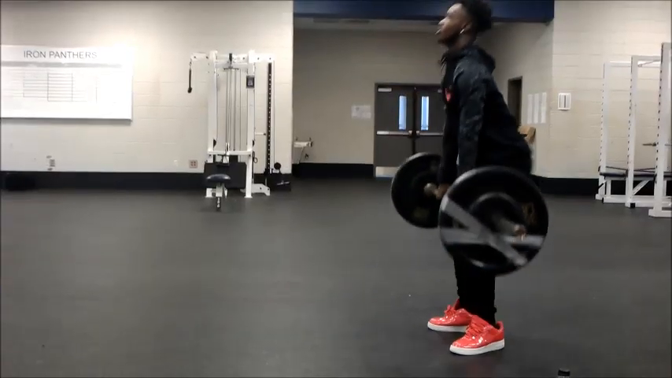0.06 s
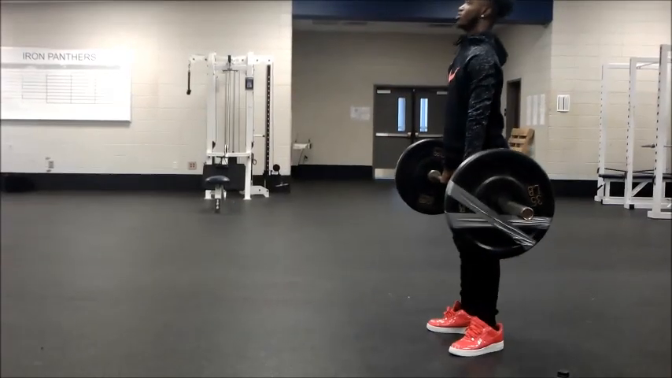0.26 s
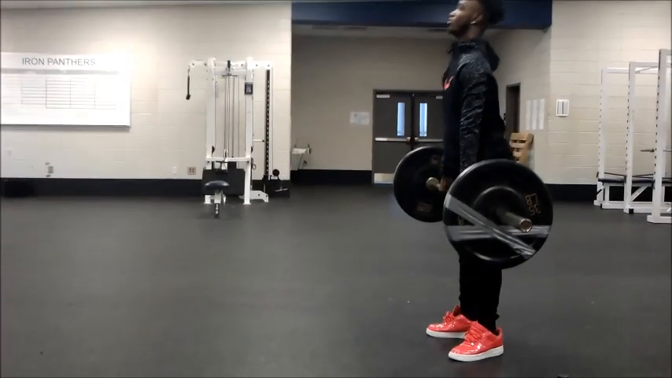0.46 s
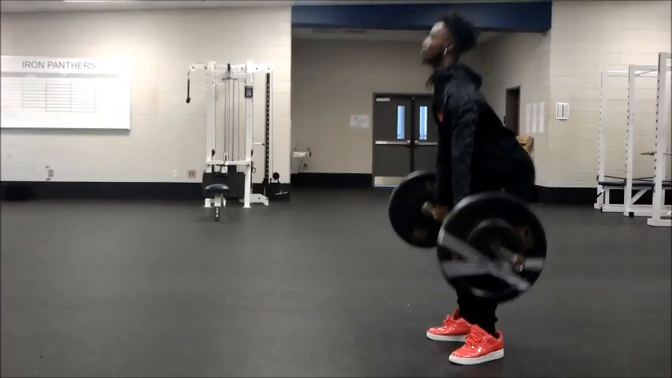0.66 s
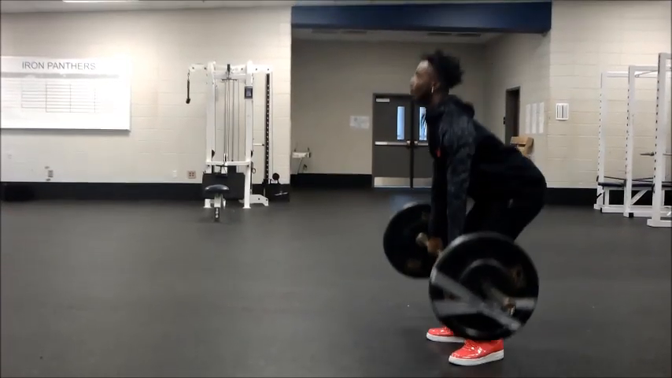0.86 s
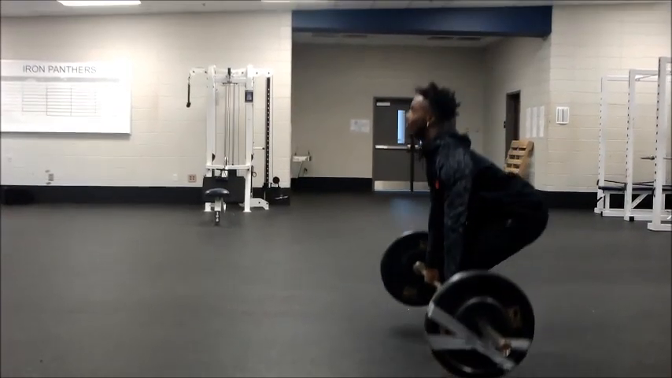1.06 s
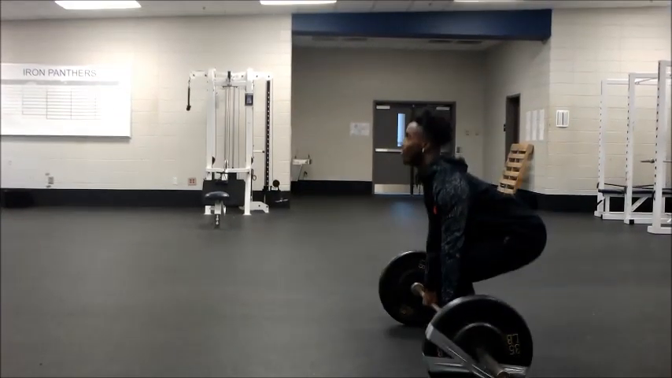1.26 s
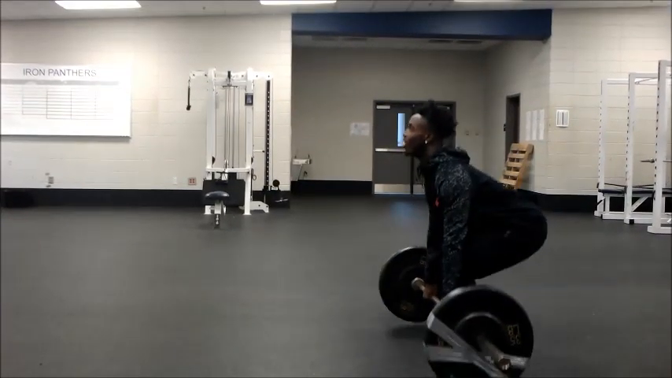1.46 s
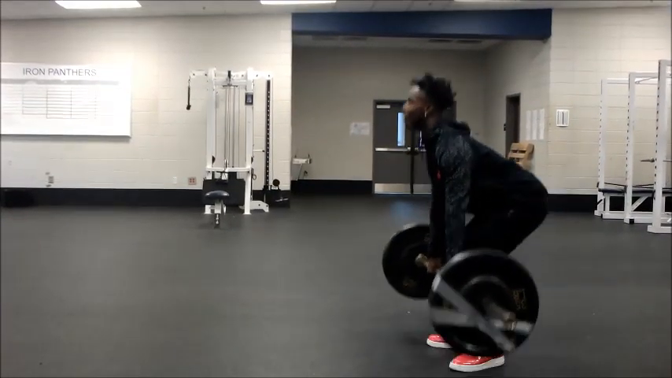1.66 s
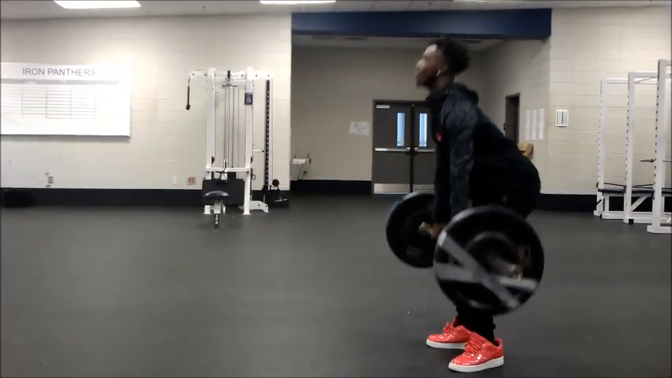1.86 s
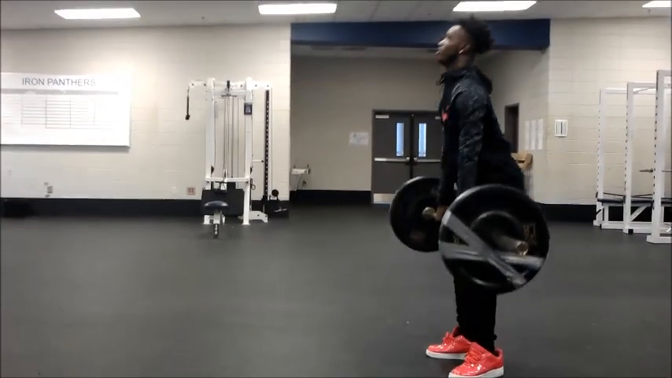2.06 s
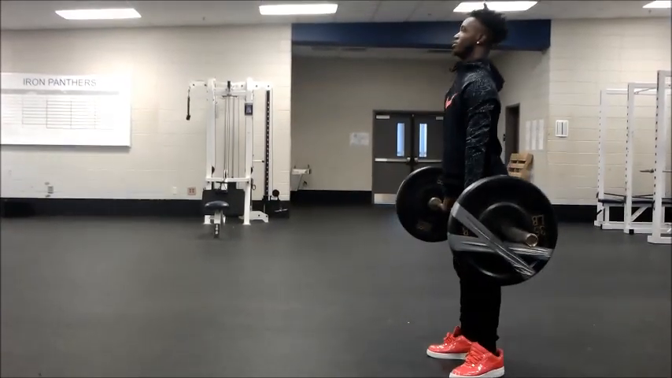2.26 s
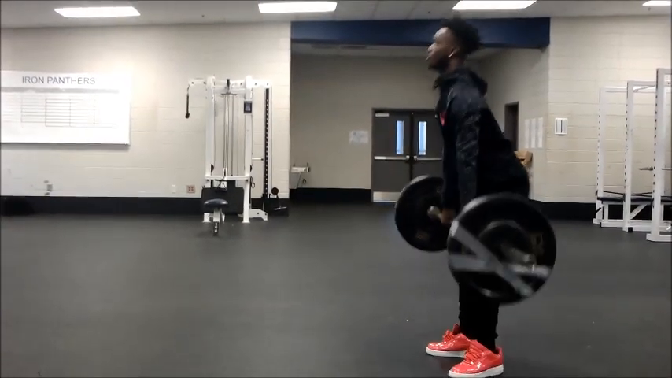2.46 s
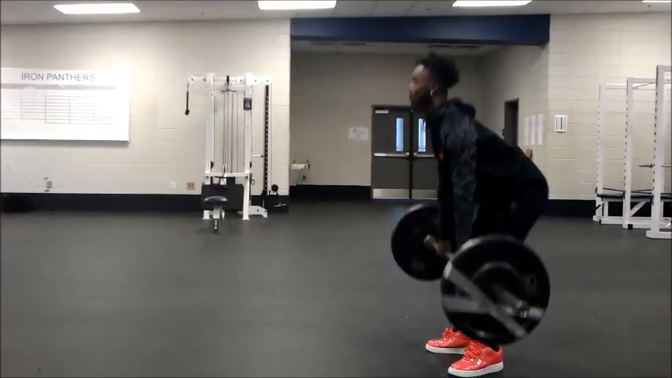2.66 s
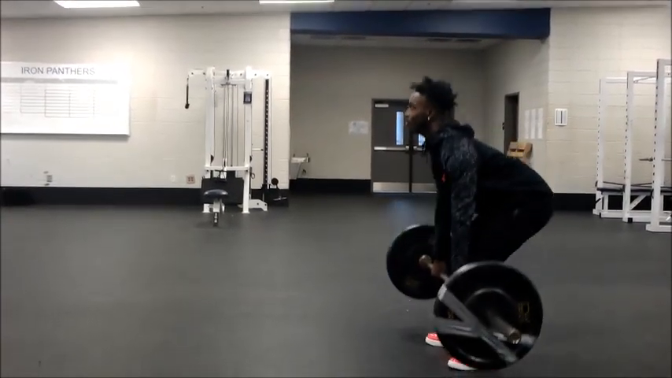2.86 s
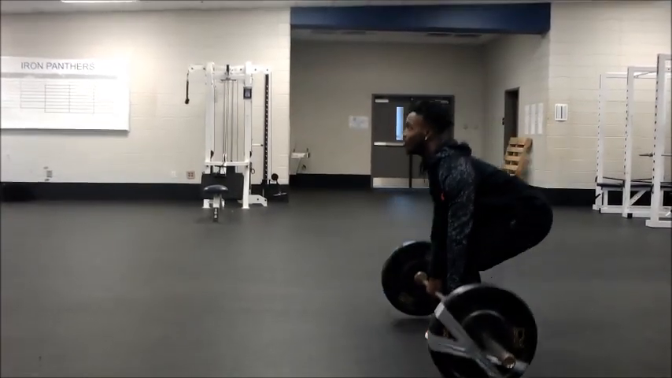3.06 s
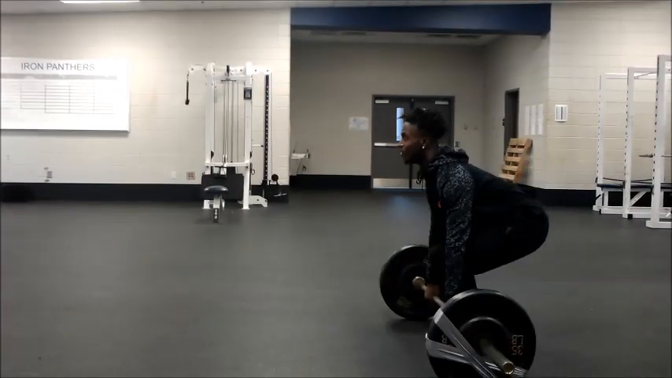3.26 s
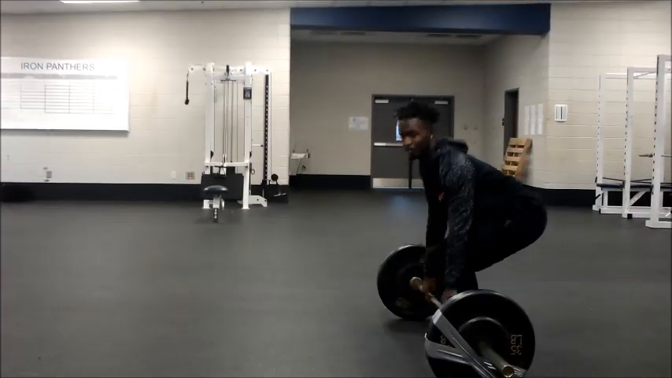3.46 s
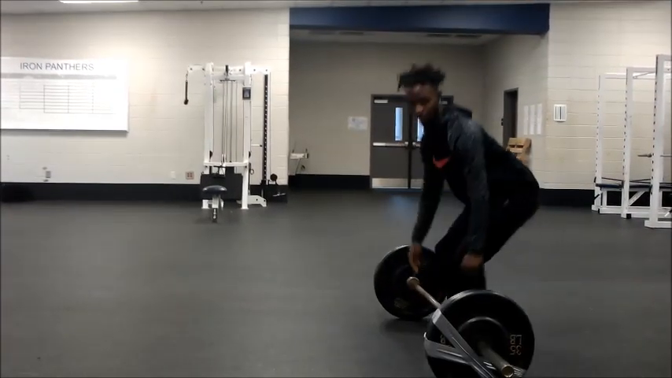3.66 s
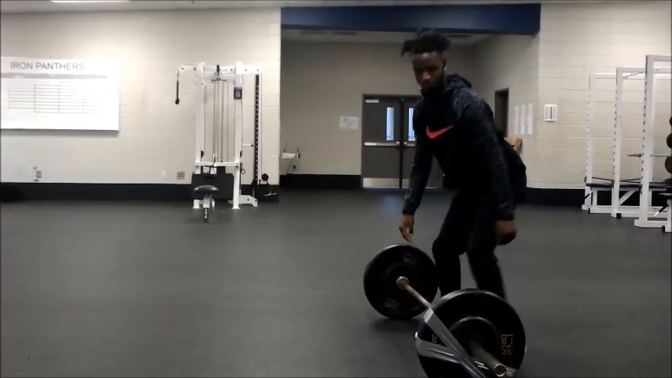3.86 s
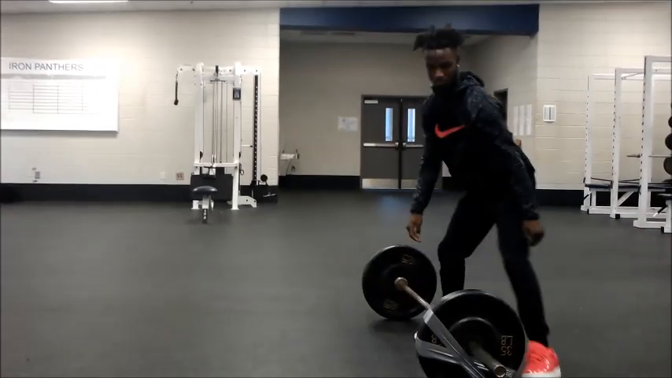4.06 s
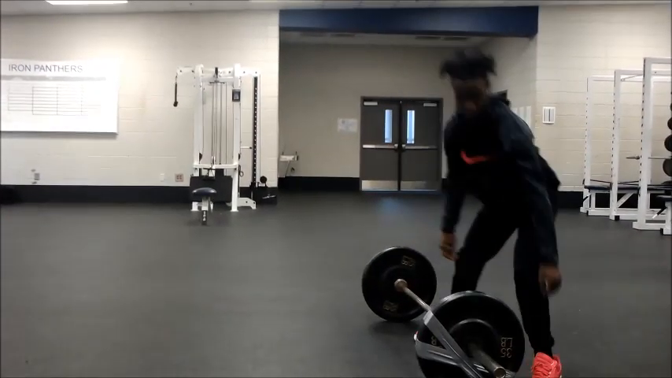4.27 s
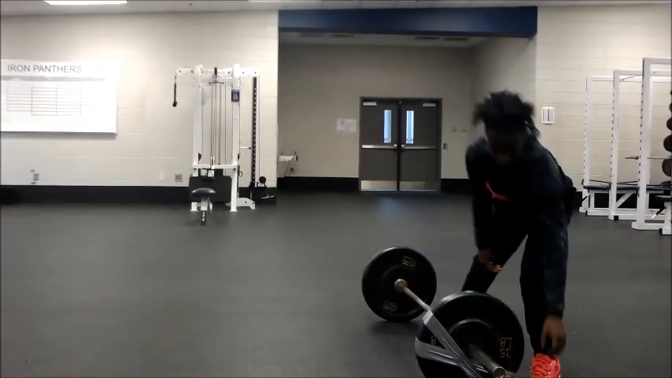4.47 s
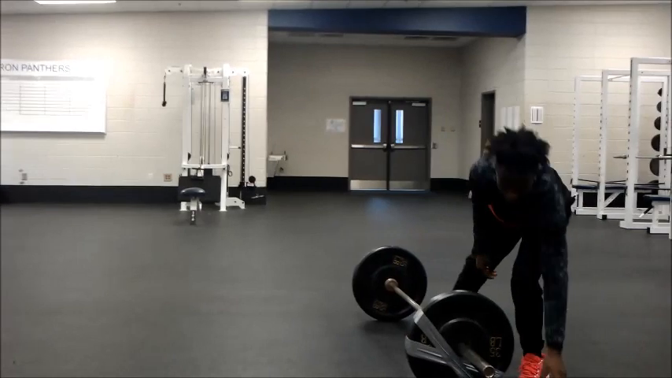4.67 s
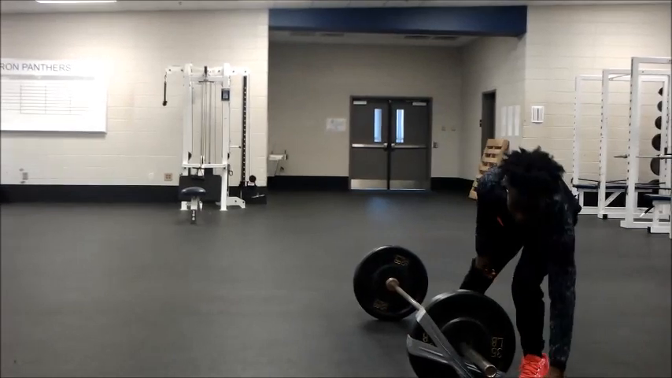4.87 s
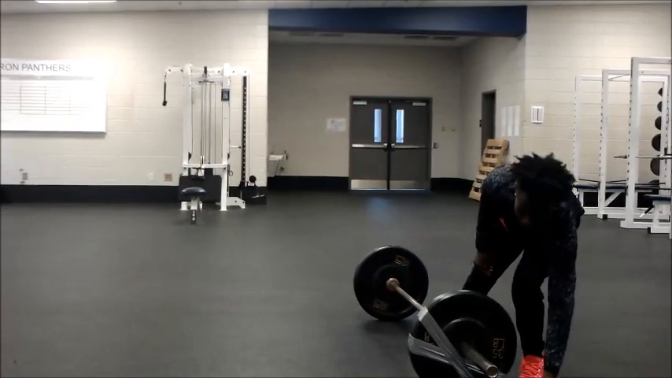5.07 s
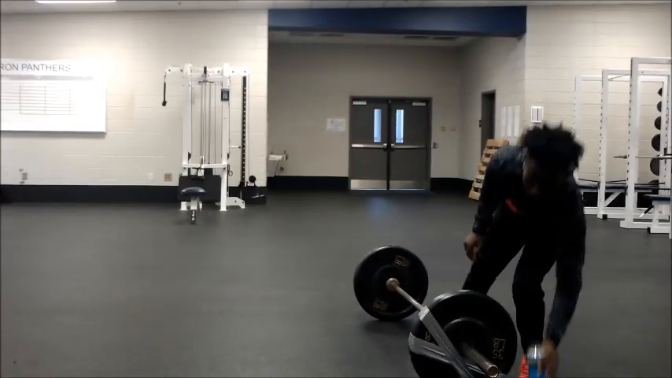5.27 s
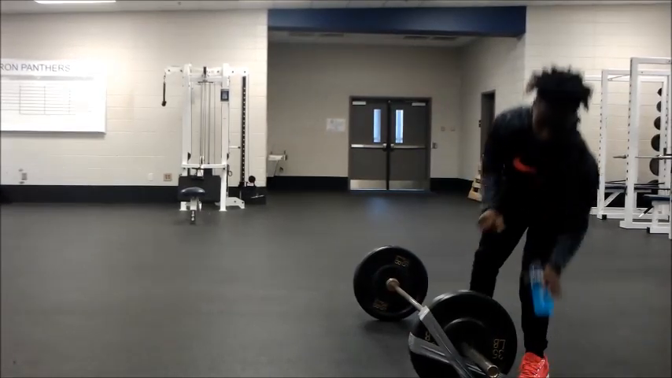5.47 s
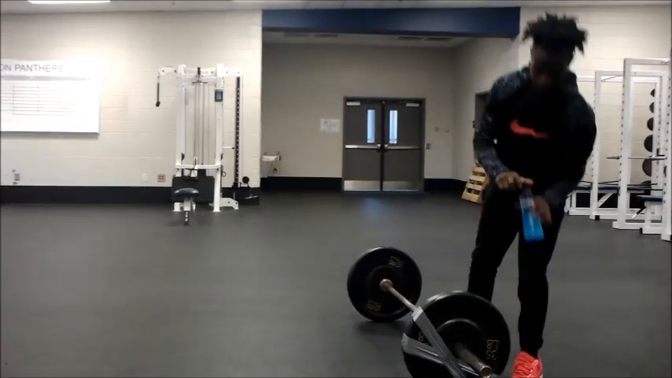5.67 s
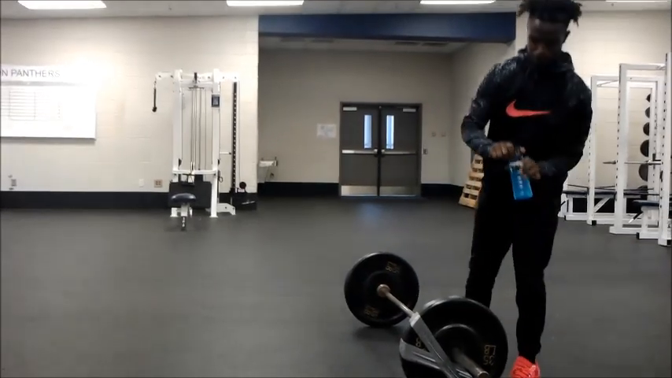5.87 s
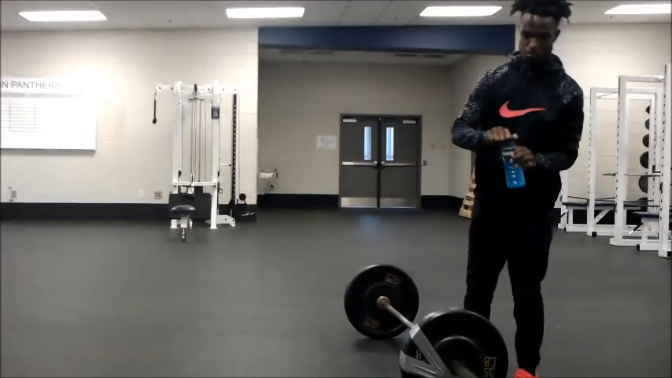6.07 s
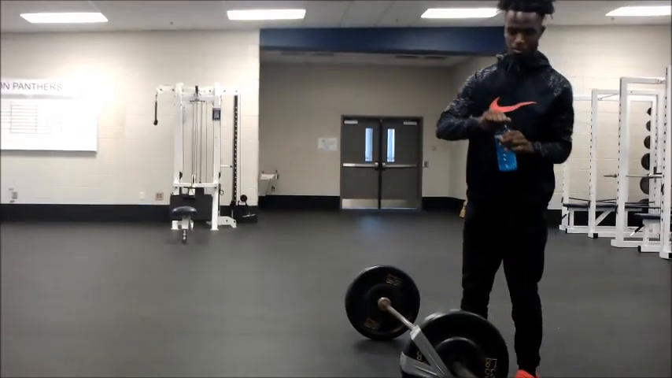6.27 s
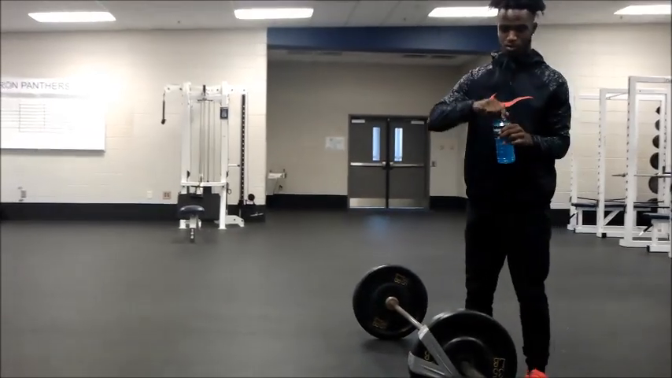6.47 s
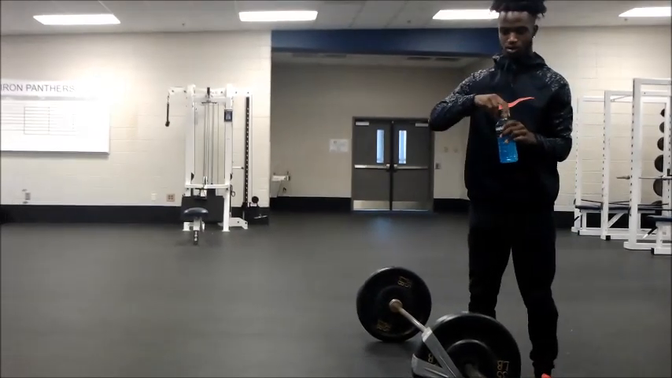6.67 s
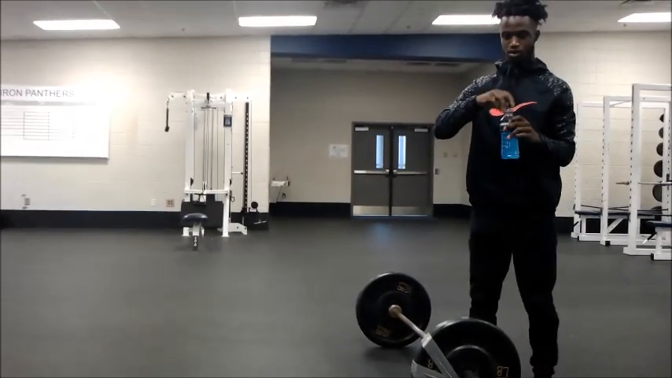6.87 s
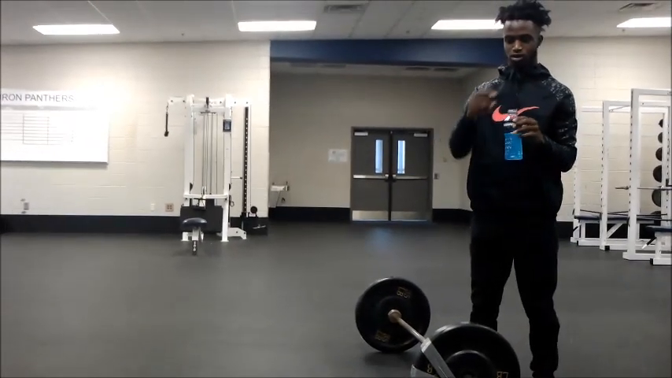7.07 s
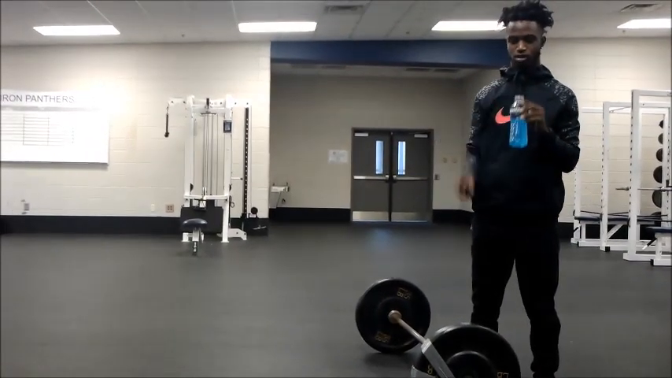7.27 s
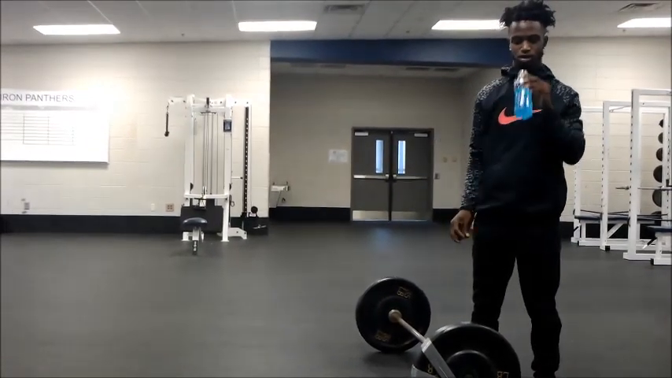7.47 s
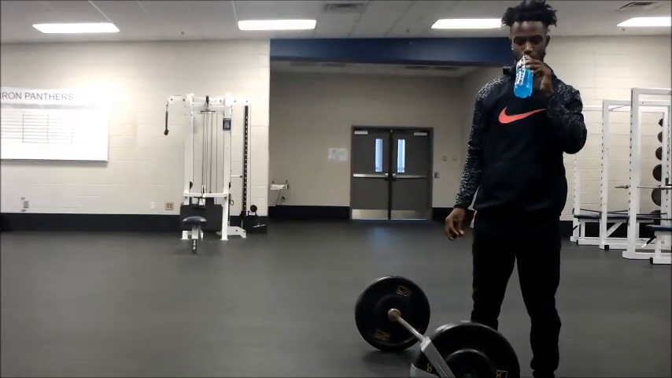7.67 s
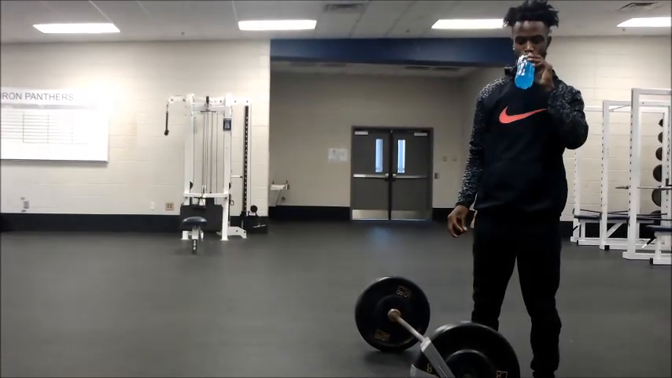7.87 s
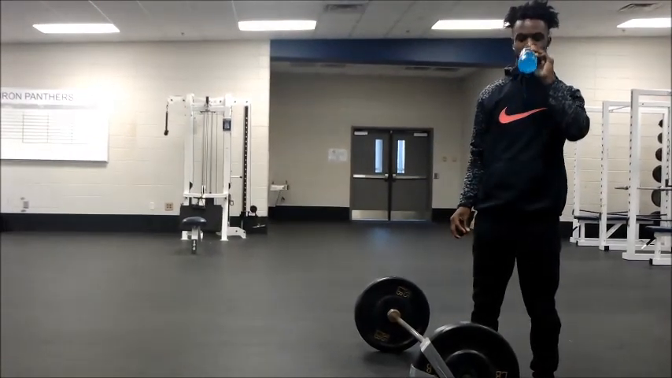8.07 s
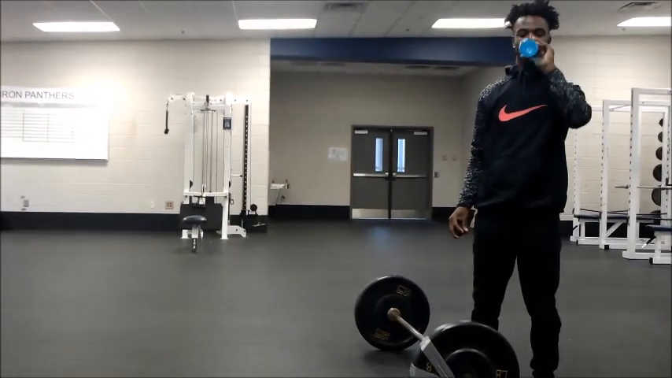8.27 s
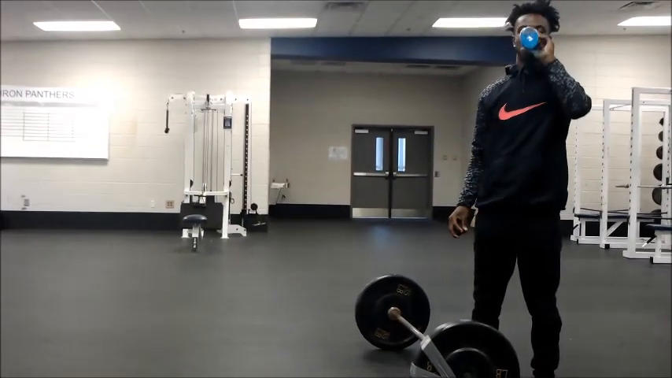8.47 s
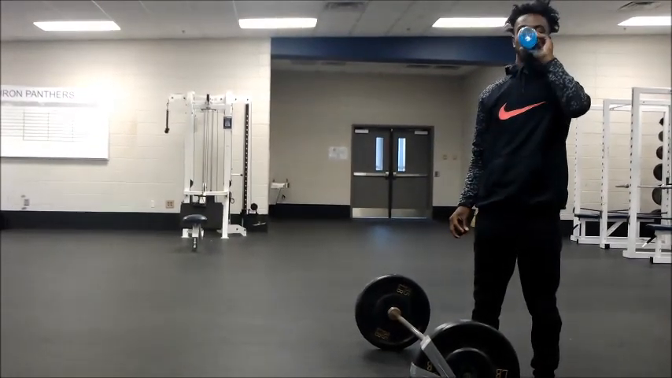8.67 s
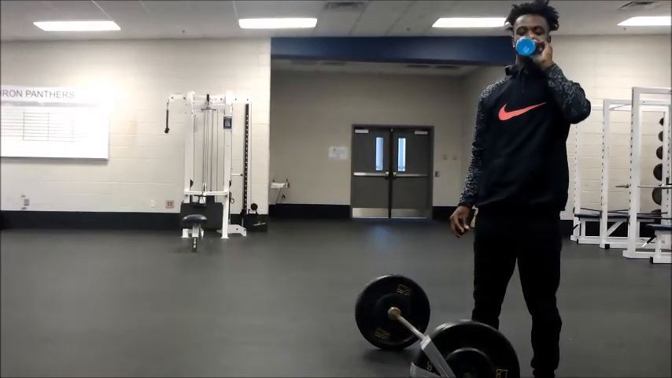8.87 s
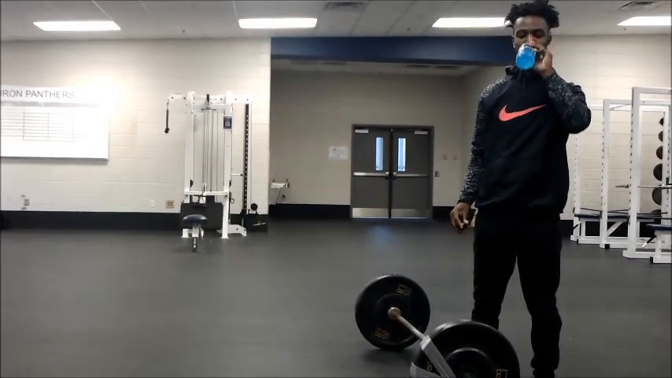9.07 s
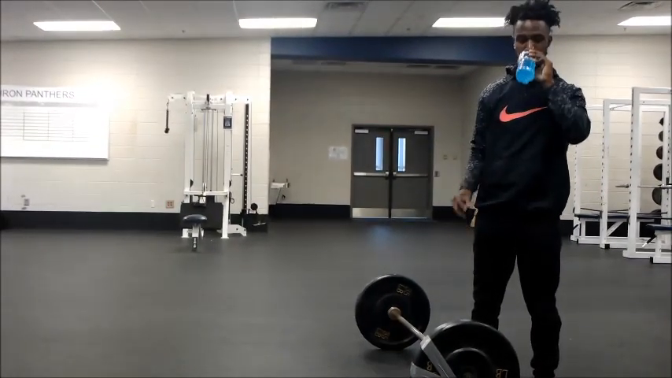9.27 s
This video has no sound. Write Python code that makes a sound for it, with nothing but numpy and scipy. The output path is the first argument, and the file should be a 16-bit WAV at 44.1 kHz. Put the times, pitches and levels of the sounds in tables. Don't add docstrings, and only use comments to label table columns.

```python
import sys
import numpy as np
from scipy import signal
from scipy.fft import rfft, irfft
from scipy.io import wavfile
from scipy.ndimage import uniform_filter1d

SR = 44100
rng = np.random.default_rng(int(sys.argv[2]) if len(sys.argv) > 2 else 0)


def wav_record(signal):
    frames = np.transpose(np.atleast_2d(signal))
    bounded = np.clip(frames, -1, 1)
    quanta = np.round(bounded * 32767).astype(np.int16)
    wavfile.write(sys.argv[1], SR, quanta)


def gain_from_db(level_db):
    decades = np.asarray(level_db, float) / 20
    return 10 ** decades


N = 411012


def rms_one(x):
    return x / np.sqrt(np.mean(x ** 2) + 1e-20)


def coloured(x, points):
    hz, db = np.transpose(points)
    grid_hz = np.fft.rfftfreq(len(x), 1 / SR) + 1
    gain_db = np.interp(np.log(grid_hz), np.log(hz), db)
    return irfft(rfft(x) * gain_from_db(gain_db), len(x))


def clicks(times_s, db):
    out = np.full(N, 1e-18)
    out[np.round(np.asarray(times_s) * SR).astype(int)] += gain_from_db(db)
    return out


def ring(x, hz, t60_s):
    r = gain_from_db(-60 / (t60_s * SR))
    w = 2 * np.pi * hz / SR
    return signal.lfilter([0, np.sin(w)], [1, -2 * r * np.cos(w), r * r], x)


def resonance(x, hz, width_hz):
    r = np.exp(-np.pi * width_hz / SR)
    w = 2 * np.pi * hz / SR
    return signal.lfilter([(1 - r * r) / 2, 0, (r * r - 1) / 2], [1, -2 * r * np.cos(w), r * r], x)


def bandpass(x, low_hz, high_hz):
    return signal.sosfilt(signal.butter(2, [low_hz, high_hz], "band", fs=SR, output="sos"), x)


def puff(t60_s, size):
    return rng.standard_normal(size) * gain_from_db(-60 * np.arange(size) / SR / t60_s)


def peak_one(x):
    return x / np.abs(x).max()


def add_at(out, start_s, burst):
    at = round(start_s * SR)
    out[at:at + len(burst)] += burst


def plates(crack_db, contact_s):
    # start_s, strength_db, part struck, extra_ring_db
    clanks = [(1.376, -7.5, "all", 14), (1.389, -7, "hub", 8.5), (1.407, -15.5, "web", 3.5),
              (1.417, -16.5, "rim", 3), (1.470, -12.5, "sleeve", 10), (1.502, -16, "sleeve", 1),
              (3.279, -13, "web", 11), (3.291, -7, "sleeve", 2.5), (3.315, -20, "rim", 0.5),
              (3.342, -15, "rim", 4.5), (3.385, -22.5, "hub", 10), (3.402, -13.5, "sleeve", 15.5),
              (3.527, -12, "all", 2), (3.548, -14, "hub", 13.5), (3.590, -19.5, "rim", -8.5),
              (3.610, -22, "sleeve", 5.5)]
    # start_s, strength_db, part struck, extra_ring_db
    shifts = [
        (.001, -48.5, "hub", 0),
        (.025, -42.5, "hub", 14.5),
        (.067, -44, "rim", 3.5),
        (0.399, -44.5, "rim", 3),
    ]
    # mode_hz, level_db, t60_s
    modes = [(1342, -3.5, 0.055), (1400, -10, 0.14), (2448, -24, .1), (3486, -9.5, 0.2), (3457, 0.5, 0.022),
             (3665, -14.5, 0.08), (4256, -21.5, 0.06), (4600, -17.5, 0.15), (5390, -12.5, .05),
             (6034, -2, 0.18), (6646, -16, 0.076), (7095, -13.5, .08), (7665, -14, 0.074),
             (8150, -10.5, 0.15), (8387, -0.5, 0.12), (8485, -3.5, 0.16), (8860, -9, 0.11),
             (8804, -6.5, 0.086), (9000, -10, 0.25), (9170, -3.5, 0.089), (9472, -16, 0.08),
             (9960, -11, 0.051), (9850, -6, 0.11), (10540, -13, .08), (10940, -10.5, 0.16),
             (11310, -6, 0.11), (12600, -25.5, 0.16), (13560, -26.5, .18), (14200, -30.5, .18),
             (15100, -32, .1)]
    part_edges_hz = [2000, 5000, 7000]
    parts = ["hub", "web", "sleeve", "rim"]
    passed_on_db = [-14, -10, -11, 3]
    # freq_hz, density_db (per Hz)
    crack_spectrum = [(150, -32), (400, -17), (700, -14), (1350, -6), (2200, -9.5), (3500, -5.5),
                      (5000, -5), (7000, -4.5), (8700, -3.5), (11300, -14.5), (12300, -20.5), (14000, -30),
                      (16000, -40.5)]
    shift_treble_db = -13

    rows = clanks + shifts
    times_s, strength_db = np.transpose([row[:2] for row in rows])
    chance = rng.standard_normal((len(rows), len(modes)))
    out = 0
    for k, (hz, db, t60_s) in enumerate(modes):
        part = np.searchsorted(part_edges_hz, hz)
        extra_db = np.array([more_db * (on == parts[part] or on == "all" and part < 3)
                             for _, _, on, more_db in rows])
        extra_db[len(clanks):] += shift_treble_db * (part > 1)
        hit_db = strength_db + passed_on_db[part] + extra_db + db - 7.5 + 2.0 * chance[:, k]
        hits = resonance(clicks(times_s, hit_db), hz, 1 / contact_s)
        out = out + ring(hits, hz, min(t60_s, .22))
    size = 4096
    chatter = 1 - .8 * np.exp(-np.arange(size) / SR / .001)
    for s, db in zip(times_s, strength_db):
        crack = coloured(puff(.075, size) * chatter, crack_spectrum)
        add_at(out, s, gain_from_db(db + crack_db) * peak_one(crack))
    return out


def thuds():
    # start_s, peak_db
    landings = [
        (1.348, -36.5),
        (1.376, -33),
        (3.267, -42.5),
        (3.283, -29),
        (3.40, -40.5),
        (3.529, -44),
    ]
    low = bandpass(puff(0.13, 8192), 75, 500)
    return signal.fftconvolve(clicks(*np.transpose(landings)), peak_one(low))[:N]


def stand():
    # start_s, peak_db, snap_db, tilt_db (per octave)
    knocks = [(0.131, -44, -12, -9), (0.405, -44, -8, -7), (0.518, -45, -20, -11), (2.504, -28.5, -1, 1.5),
              (2.692, -30, -5, 0.5), (2.894, -31.5, -13.5, 6.5), (3.869, -24, 0.5, 4),
              (3.962, -36.5, -17, -17), (4.351, -41, -3.5, 2.5), (4.627, -28.5, -4, 5.5),
              (4.673, -47, -20, -12), (4.796, -39.5, -30, -18), (4.886, -43.5, 3, 11),
              (5.73, -33, -4.5, -1.5), (5.848, -42.5, -25, -7.5), (6.485, -46.5, -18, -2.5),
              (6.715, -50, -12, 0.5), (6.904, -49, -11, 16.5), (7.642, -46, -31, -5),
              (8.023, -42, -23, -16), (8.345, -45, -17, -12), (8.476, -53, -6, 5), (8.538, -49, -25.5, -11),
              (8.55, -45.5, -21, -20), (8.441, -52.5, -24.5, -17.5), (8.289, -57, -15.5, 4)]
    # mode_hz, level_db, t60_s
    plastic_modes = [(199.3, -8.5, 0.065), (290.6, -21, 0.076), (568.4, -6.5, 0.055), (766, -19, 0.057),
                     (953, -2, 0.17), (1114, -3.5, .05), (860, -16.5, 0.086), (1328, -9.5, .03),
                     (1570, 1.5, .03), (1855, -1, .045), (2068, -2, 0.065), (2380, -8.5, 0.04),
                     (2757, -33, .025)]
    swell_s = [0.0031, 0.0017]
    low_lag_s, early_share = .0045, 0.12

    out, size = np.zeros(N), 4096
    for s, db, snap_db, tilt_db in knocks:
        slip = puff(.016, size)
        slip = 0.6 * slip / np.sqrt(np.sum(slip ** 2)) + (np.arange(size) == 0)
        late = np.roll(slip, round(low_lag_s * SR))
        blows = [early_share * slip + late, slip]
        body = 0
        for k, (hz, mode_db, t60_s) in enumerate(plastic_modes):
            high = int(hz > 1400)
            swell = resonance(blows[high], hz, 1 / swell_s[high]) * (swell_s[high] * SR) ** .6
            level_db = mode_db + tilt_db * np.log2(max(hz, 940) / 1300)
            body = body + (-1) ** k * gain_from_db(level_db) * ring(swell, hz, min(t60_s, .06))
        snap = bandpass(puff(0.02, size), 3300, 9000)
        rattle = bandpass(puff(0.19, size), 250, 1600)
        knock = gain_from_db(db + 1.0) * peak_one(body) + gain_from_db(db - 9) * peak_one(rattle)
        knock = knock + gain_from_db(db + snap_db + 4.5) * peak_one(snap)
        add_at(out, s - .002, knock)
    return out


def bottle():
    # start_s, peak_db, lower_mode_db
    flexes = [
        (8.181, -50, -9.5),
        (8.2165, -51, -9.5),
        (8.2353, -50, -12),
        (8.289, -47, -10),
        (8.4361, -52, -16),
        (8.446, -54, -16),
        (8.4746, -47.5, 12),
        (8.5384, -44.5, 3),
        (8.545, -39.5, -6),
        (8.749, -56, 4),
    ]
    low_hz, high_hz, width_hz = 3360, 5200, 420
    out = np.zeros(N)
    for s, db, low_db in flexes:
        snap = puff(0.0059, 1024)
        burst = gain_from_db(low_db) * resonance(snap, low_hz, width_hz) + resonance(snap, high_hz, width_hz)
        burst = burst + gain_from_db(-22) * resonance(snap, 8200, 3300)
        add_at(out, s, gain_from_db(db - 1.5) * peak_one(burst))
    return out


def ticks():
    # start_s, peak_db, centre_hz
    clips = [(0.0301, -66, 8400), (0.0713, -53, 9450), (0.1294, -49, 6100), (0.388, -42, 8110),
             (0.5437, -51, 9100), (1.3477, -37.5, 7600), (1.361, -46, 5200), (4.2283, -51.5, 7100),
             (4.684, -39, 8600), (5.1492, -54, 3810), (5.2495, -50.5, 9400), (5.3203, -47, 8700),
             (5.3538, -49, 9750), (5.8855, -44, 9240), (6.5255, -49, 9500), (6.7496, -58, 2980),
             (6.7753, -46, 9330), (6.9082, -40, 9830), (7.0785, -44.5, 9400), (7.329, -50, 7000),
             (7.7383, -44.5, 9160), (8.9245, -50, 9100)]
    out = np.zeros(N)
    for s, db, hz in clips:
        burst = puff(.015, 1024)
        burst = resonance(burst, hz, 0.1 * hz) + 0.73 * resonance(burst, 0.71 * hz, .4 * hz)
        add_at(out, s, gain_from_db(db - 4.5) * peak_one(burst))
    return out


def cloth():
    # centre_hz, width_hz, level_db
    hiss_bands = [(2450, 1400, -7.5), (4412, 2700, -9), (7700, 2700, -8.5), (8925, 2200, 1),
                  (9900, 4800, -6)]
    # peak_s, level_db, rise_s, fall_s
    swishes = [(.036, -63.5, 0.014, 0.0088), (.074, -67, 0.0068, 0.01), (.11, -77, .02, .18),
               (.302, -75, .008, .2), (0.399, -71.5, .012, .45), (1.36, -65, 0.041, 0.043),
               (1.9, -75, .1, .15), (2.312, -73.5, .01, .1), (2.558, -74, .05, .055), (4.0, -73.5, .1, .25),
               (4.24, -73.5, 0.031, .12), (4.728, -61.5, 0.054, 0.078), (4.6, -72, .3, .1),
               (5.14, -70, .07, 0.052), (5.5, -71, 0.27, .07), (5.91, -73.5, 0.47, 0.058),
               (6.79, -77.5, 0.046, 0.041), (6.92, -72, 0.027, .03), (7.16, -74, .17, 0.038),
               (7.26, -78.5, .03, 0.92), (7.75, -80, 0.078, 0.13), (8.48, -77, 0.07, 0.16),
               (8.76, -74.5, .03, 0.065), (8.93, -77.5, 0.091, 0.043)]
    # start_s, end_s, level_db
    chafing = [
        (.8, 1.36, -82),
        (2.0, 3.247, -80.5),
        (5.897, 6.8, -77.5),
        (7.8, 8.33, -83.5),
    ]
    t = np.arange(N) / SR
    power = 0
    for s, db, rise_s, fall_s in swishes:
        drop_db = 12 * np.maximum((s - t) / rise_s, (t - s) / fall_s)
        power = power + gain_from_db(db - drop_db) ** 2
    for a, b, db in chafing:
        power = power + gain_from_db(db) ** 2 * np.interp(t, [a - .05, a, b, b + .05], [0, 1, 1, 0])
    grains = rng.standard_normal(N) * gain_from_db(2.2 * rng.exponential(1, N))
    hiss = 0
    for hz, width_hz, db in hiss_bands:
        hiss = hiss + gain_from_db(db) * rms_one(resonance(resonance(grains, hz, width_hz), hz, width_hz))
    return np.sqrt(power) * rms_one(hiss)


def ventilation():
    # freq_hz, density_db (per Hz)
    air_spectrum = [(12, -50), (20, -26), (42, -5.5), (65, -3), (85, -20), (116, -3), (192, -16.5),
                    (240, -16), (276, -18.5), (443, -21), (637, -23.5), (693, -24), (1650, -33.5),
                    (9040, -47), (15800, -47)]
    # centre_hz, width_hz, rms_db
    hums = [(56.45, 14, -59), (109.27, 15, -64)]
    out = gain_from_db(-54.5) * rms_one(coloured(rng.standard_normal(N), air_spectrum))
    white = rng.standard_normal(N)
    for hz, width_hz, db in hums:
        out = out + gain_from_db(db) * rms_one(resonance(resonance(white, hz, width_hz), hz, width_hz))
    return out


def hall(x, build_s):
    # freq_hz, t60_s
    decay_points = [(100, 3.3), (500, .9), (1500, 0.63), (4000, .65), (8000, 0.49), (13000, 0.37)]
    hz, t60_s = np.transpose(decay_points)
    t, tail = np.arange(SR) / SR, 0
    for low_hz in 40 * 2. ** np.arange(9):
        band = bandpass(rng.standard_normal(SR), low_hz, min(2 * low_hz, .45 * SR))
        decay_s = np.interp(np.log(low_hz * 1.4), np.log(hz), t60_s)
        tail = tail + band * gain_from_db(-60 * t / decay_s)
    tail = tail * (1 - np.exp(-t / build_s))
    return signal.fftconvolve(x, tail / np.sqrt(np.sum(tail ** 2)))[:N]


def scene():
    bar = plates(crack_db=0.5, contact_s=0.0013) + thuds()
    small, near = ticks(), stand() + bottle()
    wet = hall(bar + gain_from_db(1) * small + gain_from_db(-24.5) * near, build_s=0.0014)
    far = gain_from_db(-3.5) * bar + gain_from_db(-6.0) * wet
    return (far + near + small + gain_from_db(3) * cloth() + ventilation())[None]


def masked(x, below_db):
    def frame_power(v):
        return uniform_filter1d(v ** 2, size=1024)[:, 512::1024]

    edges_hz = np.arange(11900, 16200, 420)
    spectrum, hz = rfft(x), np.fft.rfftfreq(N, 1 / SR)
    whole = frame_power(np.diff(x, prepend=0))
    out = x
    for low_hz, high_hz in zip(edges_hz, edges_hz[1:]):
        band = irfft(spectrum * ((hz >= low_hz) & (hz < high_hz)), N)
        lost = np.repeat(frame_power(band) < whole * gain_from_db(below_db) ** 2, 1024, axis=1)
        lost = np.pad(lost, [(0, 0), (0, 1024)])[:, :N]
        out = out - band * uniform_filter1d(lost * 1., size=128)
    return out


def dulled(bright, dry):
    dull_from_s = [1.371, 2.494, 2.685, 2.877, 3.261, 3.517, 3.838, 3.868, 4.349, 4.606, 4.861, 5.727]
    dull_s, dull_hz = .028, 8620
    dull = signal.sosfiltfilt(signal.ellip(10, .3, 35, dull_hz, fs=SR, output="sos"), dry)
    t = np.arange(N) / SR
    fade_s = [-.002, .001, dull_s + .001, dull_s + .004]
    share = np.max([np.interp(t - a, fade_s, [0, 1, 1, 0]) for a in dull_from_s], axis=0)
    return bright + share * (dull - bright)


def roll_off(x):
    return signal.sosfilt(signal.butter(12, 15950, fs=SR, output="sos"), x)


def record(dry):
    dry = signal.sosfilt(signal.cheby2(12, 30, 16000, fs=SR, output="sos"), dry)
    mix = dulled(masked(dry, below_db=-41), dry)
    return roll_off(mix)


dry = scene()
out = record(dry)
wav_record(out)
```